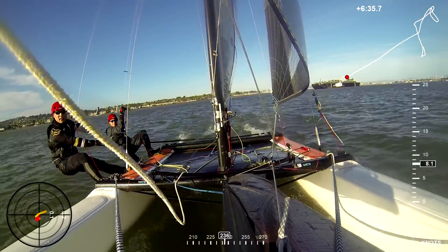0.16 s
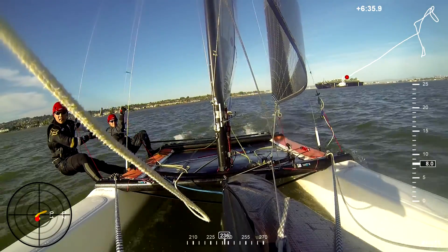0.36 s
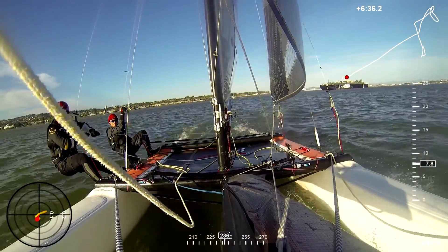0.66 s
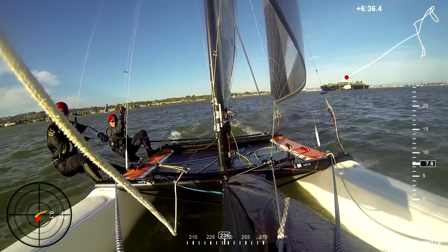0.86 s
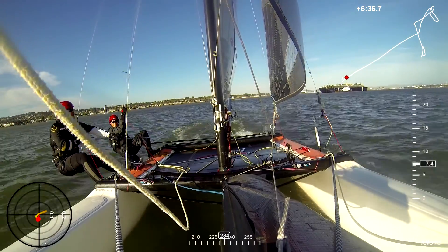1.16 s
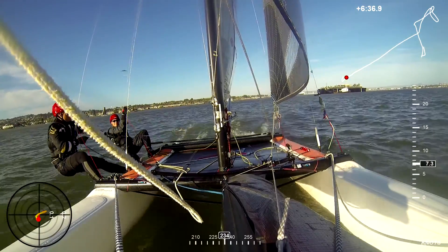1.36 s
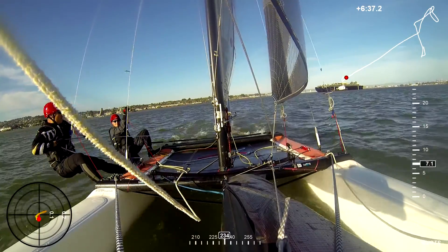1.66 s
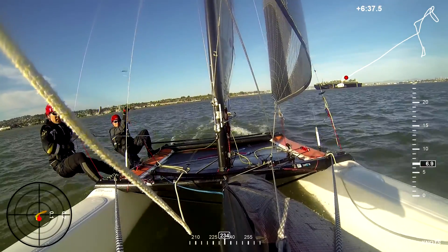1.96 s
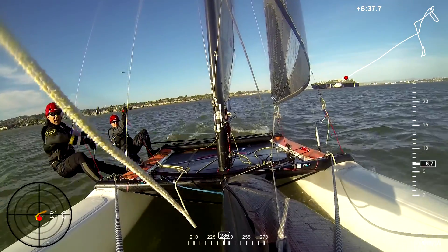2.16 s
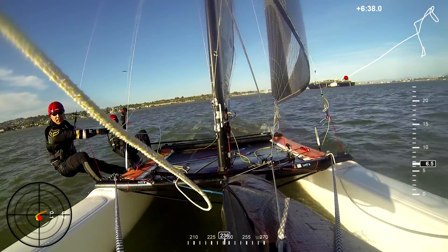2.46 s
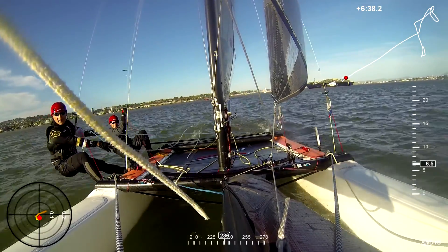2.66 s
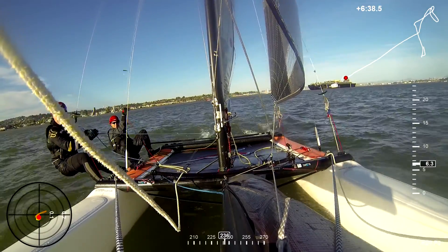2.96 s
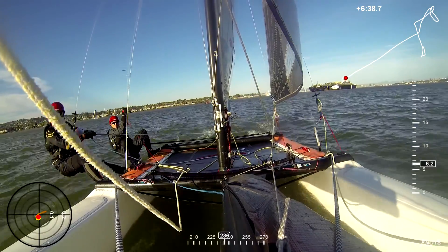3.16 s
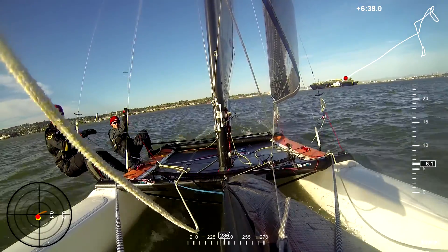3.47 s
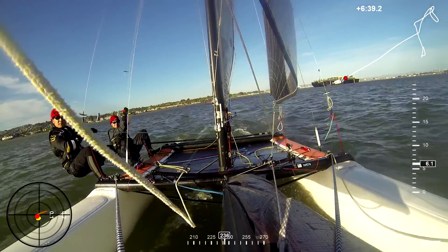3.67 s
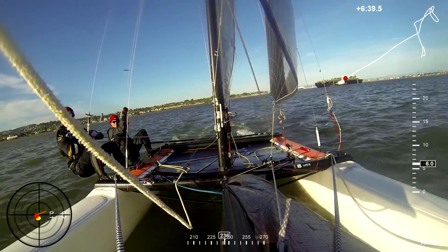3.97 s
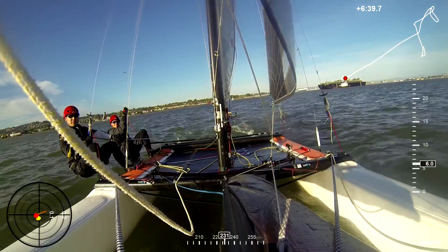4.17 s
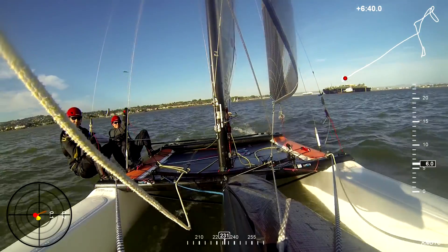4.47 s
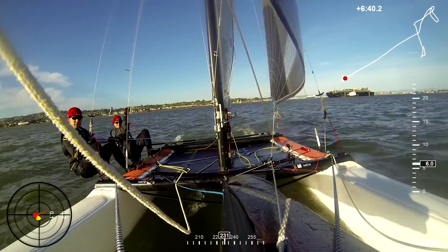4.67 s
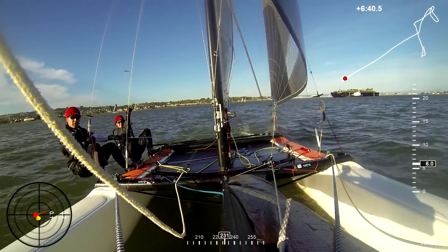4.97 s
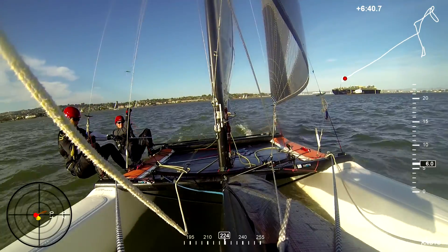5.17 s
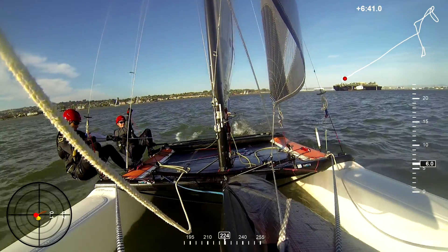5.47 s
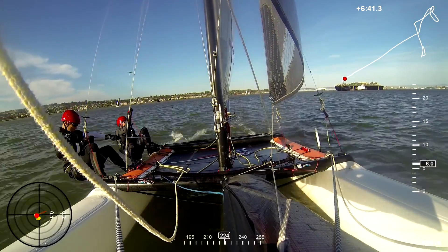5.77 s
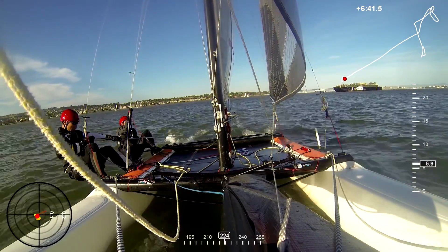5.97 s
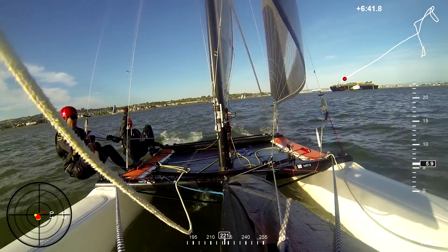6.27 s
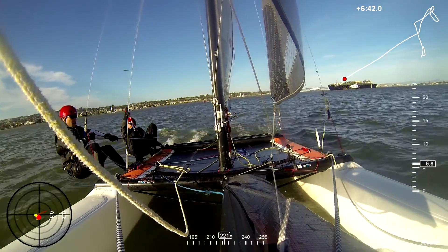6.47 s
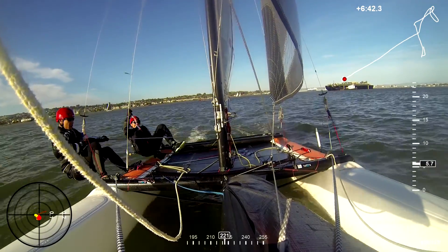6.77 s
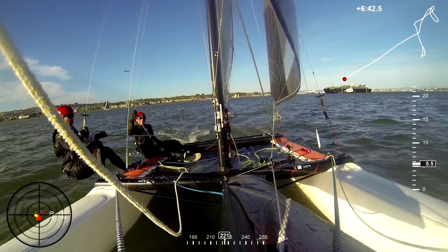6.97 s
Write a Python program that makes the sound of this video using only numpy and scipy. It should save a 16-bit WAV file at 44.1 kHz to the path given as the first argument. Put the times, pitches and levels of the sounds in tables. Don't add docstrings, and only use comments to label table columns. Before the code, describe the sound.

A small closed case on the bow of a fast two-hulled sailboat picks up low, lumpy wind buffeting and muffled water rushing along the hulls, over faint electronic hiss and buzz. Droplets tick on the case from the start, with a faint low whistle of wind on a stay in the first half second. A strong gust booms around 1.4 to 1.8 s, and the water dips slightly behind it. The wash surges near 2.3 s, with plops and knocks, the whistle returns around 2.7 to 3 s, and a hard tick lands at 2.8 s. A ringing boom comes at 3.8 s. The water eases towards 5.4 s, then rises again by 6 s with low wind shoves, snaps and a splashy knock near 6.15 s. Tiny high rope squeaks appear from 5.7 to 6.8 s. At about 6.88 s a heavy sheet of water slaps the case with a thud, and the background ducks briefly before the end.

```python
import sys
import numpy as np
from scipy import signal
from scipy.fft import rfft, irfft, next_fast_len
from scipy.io import wavfile
from scipy.ndimage import uniform_filter1d

SR = 44100
rng = np.random.default_rng(int(sys.argv[2]) if len(sys.argv) > 2 else 0)


def amplitude_ratio(level_db):
    exponent = np.asarray(level_db, float) / 20
    return 10 ** exponent


def master_out(mix):
    frames = np.transpose(np.atleast_2d(mix))
    ceiling = np.clip(frames, -1, 1)
    pcm = np.round(ceiling * 32767).astype(np.int16)
    wavfile.write(sys.argv[1], SR, pcm)


N = 313330
TIME = np.arange(N) / SR


def rms_one(x):
    return x / np.sqrt(np.mean(x ** 2) + 1e-20)


def in_time(rows):
    s, *columns = np.transpose(rows)
    return [np.interp(TIME, s, column) for column in columns]


def swing(rows, share):
    level_db = in_time(rows)[0]
    return level_db.mean() + share * (level_db - level_db.mean())


def passing(rows, layer_hz, octaves):
    out = np.zeros(N)
    for s, half, top_db, hz in rows:
        near = slice(max(0, int((s - 3 * half) * SR)), int((s + 3 * half) * SR))
        pitch_match = (np.log2(hz / layer_hz) / octaves) ** 2
        out[near] += top_db * np.exp(-pitch_match - ((TIME[near] - s) / half) ** 2)
    return out


def drift(rate):
    r = np.exp(-40 * np.pi * rate / SR)
    noise = rng.standard_normal(N // 20 + 4002)
    slow = signal.lfilter([1], [1, -2 * r, r * r], noise)[4000:]
    return np.interp(np.arange(N) / 20, np.arange(len(slow)), rms_one(slow))


def evened(x, window_s):
    return x / np.sqrt(uniform_filter1d(x ** 2, size=int(window_s * SR)) + 1e-20)


def band(x, low_hz, high_hz):
    run_in = np.concatenate([x[SR // 4:0:-1], x])
    sos = signal.butter(3, [low_hz, high_hz], "band", fs=SR, output="sos")
    return signal.sosfilt(sos, run_in)[-N:]


def colour(x, spectrum, modes=()):
    size = next_fast_len(N + SR)
    hz = np.maximum(np.fft.rfftfreq(size, 1 / SR), 1)
    corner_hz, corner_db = np.transpose(spectrum)
    db = np.interp(np.log(hz), np.log(corner_hz), corner_db)
    db = db + sum(top_db / (1 + (2 * (hz - f) / width) ** 2) for f, width, top_db in modes)
    cepstrum = irfft(np.log(amplitude_ratio(db)), size)
    cepstrum[1:size // 2] *= 2
    cepstrum[size // 2 + 1:] = 0
    return irfft(rfft(np.resize(x, size)) * np.exp(rfft(cepstrum)), size)[:N]


def resonance(x, hz, width):
    r = np.exp(-np.pi * width / SR)
    top = np.array([1, 0, -1]) * (1 - r * r) / 2
    return signal.lfilter(top, [1, -2 * r * np.cos(2 * np.pi * hz / SR), r * r], x)


# (time [s], level [dB])
WIND_STRENGTH = [(0, -24.5), (.5, -20.5), (.85, -21.5), (.97, -29), (1.35, -23.5), (1.44, -12.5),
                 (1.85, -16.5), (2.05, -22.5), (2.85, -20.5), (3.4, -27.5), (3.7, -29.5), (3.85, -20),
                 (4.4, -30), (4.65, -23), (5.8, -28), (6.75, -26), (6.95, -40.5), (7.1, -29)]
# (time [s], half length [s], level over the wind [dB], size as pitch [Hz])
EDDIES = [(.32, 0.2, 8.5, 25), (.51, 0.061, 3, 69.6), (.61, 0.048, 9, 25), (.93, 0.062, 9.5, 25),
          (1.53, 0.054, -24, 25), (1.66, 0.073, 5.5, 55.4), (1.74, 0.035, -12, 65.6),
          (2.39, 0.061, 5.5, 171), (2.57, .04, 4, 24.8), (2.57, 0.039, -11, 109), (2.83, 0.043, -0.5, 70),
          (3.5, 0.022, 14.5, 25), (3.64, 0.033, 10, 25), (3.81, 0.041, 3, 170), (4.41, 0.077, 12, 25),
          (4.76, 0.15, -18, 40.4), (5.18, 0.088, -12, 55), (5.48, 0.023, 11.5, 25), (5.57, 0.06, 2, 120),
          (5.91, 0.023, 9, 150), (6.02, 0.087, 12, 25), (6.25, 0.069, 16, 44.2), (6.36, 0.023, -12, 100),
          (6.62, 0.066, 12, 64.6), (6.78, 0.11, 11, 25), (7.02, 0.054, 13, 25)]
# (frequency [Hz], level per Hz [dB])
BUFFET_COLOUR = [(7.1, -25), (12, 6), (25, -2), (92, -6), (181, -2), (294, -12), (345, -23.5), (400, -16.5),
                 (520, -70.5), (880, -120)]
# (frequency [Hz], width [Hz], gain [dB])
CASE_MODES = [(129.3, 11.3, 6.5), (186, 64, 5.5), (353.4, 35, 6.5), (552.4, 294, 11.5), (683, 67, -5.5),
              (966, 190, 9), (1060, 660, -1.5), (1471, 330, 7.5), (1720, 190, 8.5), (2090, 126, -8),
              (2330, 50, 7), (2810, 210, -6), (5930, 820, -8.5), (6450, 420, 4.5)]


def wind(lumpy_db):
    octaves = 0.84
    heave_db = -2 + swing(WIND_STRENGTH, 0.2) + passing(EDDIES, 33, octaves)
    buffet_db = -4 + swing(WIND_STRENGTH, 0.87) + passing(EDDIES, 69, octaves)
    boom_db = -2.5 + swing(WIND_STRENGTH, 0.96) + passing(EDDIES, 140, octaves)
    noise = colour(rng.standard_normal(N), BUFFET_COLOUR, CASE_MODES)
    heave = evened(band(noise, 10.9, 51.5), 0.28)
    buffet = evened(band(noise, 44.3, 80.7), 0.1)
    boom = evened(band(noise, 95.4, 274.0) * amplitude_ratio(lumpy_db * drift(25)), 0.058)
    return amplitude_ratio(heave_db) * heave + amplitude_ratio(buffet_db) * buffet + amplitude_ratio(boom_db) * boom


# (time [s], level [dB])
WHISTLE_LEVEL = [(0, -33), (.3, -30.5), (.6, -57.5), (2.5, -45), (2.7, -33), (3.0, -33), (3.2, -59),
                 (7.1, -56.5)]


def whistle(wire_hz, width):
    noise = resonance(resonance(rng.standard_normal(N), wire_hz, width), wire_hz, width)
    return amplitude_ratio(in_time(WHISTLE_LEVEL)[0]) * rms_one(noise)


def droplets(per_s, spread_db, surge):
    sizes = amplitude_ratio(spread_db * np.minimum(rng.exponential(1, N), 2)) * rng.choice([-1, 1], N)
    clicks = sizes * (rng.random(N) < per_s * amplitude_ratio(5 * surge) / SR)
    dealt = rng.integers(0, 12, N)
    out = np.zeros(N)
    for k, hz in enumerate(np.geomspace(400, 6000, 12)):
        ring = resonance(clicks * (dealt == k) + 1e-18, hz, hz / 8)
        out += resonance(ring, hz, hz / 8)
    return rms_one(out)


# (time [s], level [dB])
WATER_SPEED = [(0, -30), (.15, -33.5), (.8, -35.5), (1.1, -32.5), (1.5, -35.5), (2.0, -31), (2.3, -24),
               (2.85, -33), (3.2, -35), (3.6, -36), (3.9, -35.5), (4.25, -36.5), (4.55, -37.5),
               (5.2, -39.5), (5.4, -43.5), (6.05, -33), (6.5, -34.5), (7.1, -33.5)]
# (time [s], half length [s], level over the flow [dB], colour [Hz])
WAVES = [(.37, 0.25, 4, 2200), (.49, 0.034, 5.5, 480), (.81, 0.12, 4.5, 598), (.95, 0.024, -9.5, 1290),
         (1.07, 0.1, 5, 900), (1.22, 0.14, 3.5, 4000), (1.38, 0.044, 4, 480), (1.62, 0.056, 10, 700),
         (2.45, 0.24, -7.5, 4040), (2.69, .07, 5.5, 1300), (3.34, 0.023, -1, 4000), (3.58, 0.26, 5.5, 1800),
         (4.25, 0.059, 2, 600), (4.73, 0.078, 7.5, 1290), (5.02, 0.16, 6, 2160), (5.2, 0.057, 9.5, 700),
         (5.61, 0.059, 9.5, 477), (5.77, 0.3, 4.5, 4000), (6.72, 0.052, 5, 1280), (.05, 0.049, -2, 700),
         (.75, 0.096, 6, 2500), (2.05, 0.071, -5, 700), (2.5, 0.081, -3.5, 696), (3.15, 0.04, 4.5, 870),
         (3.7, 0.037, -2.5, 700), (3.93, 0.05, 2.5, 900), (4.35, 0.1, 4.5, 2500), (4.68, 0.039, -8.5, 500),
         (5.4, 0.09, 4.5, 723), (6.42, 0.034, 3.5, 2507), (6.56, 0.02, -6.5, 1500), (3.5, .05, 2, 3000),
         (2.0, 0.036, 3.5, 1000)]
# (frequency [Hz], level per Hz [dB])
RUSH_COLOUR = [(150, -30), (250, 2.5), (450, -10.5), (1230, -18.5), (1700, -18), (2330, -26.5),
               (3800, -43.5), (4900, -55), (6000, -54.5), (9000, -63.5)]


def water(per_s, spread_db, drops_db, surge_db, patchy_db):
    surge = .6 * drift(13) + .8 * drift(30)
    drops = droplets(per_s, spread_db, surge)
    flow = colour(rng.standard_normal(N) + amplitude_ratio(drops_db) * drops, RUSH_COLOUR, CASE_MODES)
    octaves = 1.85
    gurgle_db = -3 + swing(WATER_SPEED, 0.92) + passing(WAVES, 480, octaves)
    rush_db = -5 + swing(WATER_SPEED, 1) + passing(WAVES, 1500, octaves)
    spray_db = -11.5 + swing(WATER_SPEED, 1) + passing(WAVES, 3900, octaves)
    layers = ((gurgle_db, [280, 450, 800]),
              (rush_db, [800, 1200, 1550, 2045]),
              (spray_db, [2102, 2540, 3000, 3600, 4400, 6100, 9500]))
    size = next_fast_len(N + 2000)
    spectrum = rfft(np.pad(flow, 1000, "reflect"), size)
    hz = np.fft.rfftfreq(size, 1 / SR)
    out = np.zeros(N)
    for level_db, edges in layers:
        parts = np.zeros(N)
        for lo, hi in zip(edges, edges[1:]):
            window = 1 / (1 + (hz / hi) ** 10) - 1 / (1 + (hz / lo) ** 10)
            part = irfft(spectrum * window, size)[1000:1000 + N]
            parts += part * amplitude_ratio(patchy_db * np.clip(drift(16), -2, 2))
        out += amplitude_ratio(level_db) * evened(parts * amplitude_ratio(surge_db * surge), 0.18)
    return out


# (frequency [Hz], level per Hz [dB])
HISS_COLOUR = [(2000, -27.5), (4500, 4), (8000, -7), (9500, -5), (12500, -4), (13500, -13.5), (14200, 1.5),
               (15300, -2.5)]
# (frequency [Hz], width [Hz], level [dB])
BUZZ_TONES = [(5134, 280, 4), (10300, 400, -7.5), (11200, 2500, -3), (14300, 1400, -4.5)]


def circuits(hiss_db, burst_db):
    pictures_per_s = 29.97
    steady = rms_one(colour(rng.standard_normal(N), HISS_COLOUR))
    gate = uniform_filter1d(1. * ((TIME * pictures_per_s + .125) % 1 < .4), size=60)
    white = rng.standard_normal(N)
    buzz = np.zeros(N)
    for hz, width, db in BUZZ_TONES:
        tone = rms_one(resonance(resonance(white, hz, width), hz, width))
        buzz += amplitude_ratio(db + 2.2 * drift(8.4)) * tone
    return amplitude_ratio(hiss_db) * (steady + amplitude_ratio(burst_db) * gate * buzz)


# (time [s], peak [dB], ring [Hz], ring t60 [s])
SOFT_DROPS = [(.461, -10.5, 1510, 0.015), (1.027, -22, 1550, 0.022), (1.126, -15.5, 1092, 0.083),
              (1.675, -18, 1510, 0.016), (1.733, -16.5, 1540, 0.022), (1.331, -20.5, 2710, 0.018),
              (4.926, -41, 3400, .03), (1.257, -27, 1266, 0.087), (4.097, -31, 2400, 0.026),
              (3.786, -26, 2310, 0.027), (1.778, -15, 980, 0.022), (2.198, -16, 600, 0.017),
              (2.416, -22, 570, 0.027), (2.644, -8.5, 1720, 0.058), (2.748, -7, 1326, 0.015),
              (3.604, -14.5, 1580, 0.057), (3.863, -16, 1720, 0.073), (3.995, -21, 1060, 0.035),
              (4.35, -19, 565, 0.047), (4.785, -24, 1460, 0.12), (4.877, -23, 1595, 0.036),
              (5.19, -20.5, 1630, 0.082), (5.452, -17, 1480, 0.012), (5.554, -24, 1680, .016),
              (5.972, -10.5, 1325, 0.017), (6.163, -3.5, 967, 0.019), (6.665, -18, 1687, 0.069),
              (6.698, -14, 890, 0.026), (6.809, -9, 1300, 0.019), (.777, -22, 1650, 0.067)]
# (time [s], peak [dB], ring [Hz])
SPECKS = [(0.0044, -16.5, 1530), (0.063, -20, 1440), (0.1125, -19, 1400), (0.135, -20, 1510),
          (0.2333, -16.5, 1510), (0.28, -23, 1450), (0.4848, -24, 1550), (0.506, -33, 1670),
          (0.5332, -25, 1550), (0.6376, -21, 1390), (0.734, -21, 1710), (0.8849, -22, 1700),
          (0.9122, -17, 1700), (1.066, -19, 1730), (1.1179, -20, 1090), (1.506, -30, 1460),
          (1.5524, -18.5, 1710), (1.593, -13, 1510), (1.7654, -23, 958), (1.911, -18, 1410),
          (2.1078, -18, 1700), (2.7539, -14.5, 980), (2.765, -19, 1520), (3.0041, -26, 1760),
          (3.237, -17.5, 1510), (3.4555, -19, 1760), (3.5643, -17, 910), (3.9415, -20, 1580),
          (3.9778, -19, 1440), (4.008, -15, 1010), (4.1896, -30, 1770), (4.2977, -28, 1740),
          (4.6288, -23, 1620), (4.8114, -19, 1410), (5.0604, -21, 1560), (5.1114, -19, 1720),
          (5.281, -21, 1780), (5.5022, -30, 1720), (5.653, -28, 1160), (6.0077, -22, 1740),
          (6.75, -14, 1580), (7.0214, -23, 1660)]
# (time [s], peak [dB], ring [Hz], bright part [dB])
HARD_TICKS = [(0.303, -23, 1720, -10), (0.643, -26, 1400, -19), (1.246, -29, 1270, -3),
              (1.338, -26, 1614, -7), (1.578, -25, 1490, -11), (2.28, -17, 1400, -5.5),
              (2.819, -2, 1337, -5), (3.418, -25, 1500, -21), (3.784, -12.5, 1470, -27),
              (5.833, -27, 1430, -6), (5.948, -11, 1460, -12.5), (6.124, -27, 1820, -10),
              (6.404, -22, 994, -12), (6.841, -20, 1630, -7)]


def knocks(rise_cycles, crack_db):
    soft_bright_db = -31.5
    rows = [(s, db, hz, soft_bright_db, t60) for s, db, hz, t60 in SOFT_DROPS]
    rows += [(s, db - 5.5, hz, soft_bright_db, .02) for s, db, hz in SPECKS]
    for s, db, hz, bright_db in HARD_TICKS:
        t60 = 0.037 * amplitude_ratio(-0.5 * (db + 17.0))
        rows.append((s, db, hz, bright_db, t60))
    out, crack = np.zeros(N), np.zeros(N)
    t = np.arange(int(.2 * SR)) / SR
    for s, peak_db, hz, bright_db, t60 in rows:
        detune, partner = rng.random(2)
        at = round(s * SR)
        u = t[:N - at]
        shape = (1 - np.exp(-u * hz / rise_cycles)) ** 2 * amplitude_ratio(-60 * u / max(t60, .01))
        shape /= shape.max()
        pair_hz = hz * (1.1 + 0.12 * detune)
        tone = np.sin(2 * np.pi * hz * u) + 0.26 * np.sin(2 * np.pi * pair_hz * u)
        bright = amplitude_ratio(bright_db - 3.5) * shape * np.sin(2 * np.pi * (2600 + 200 * partner) * u)
        out[at:at + len(u)] += amplitude_ratio(peak_db) * shape * (tone + bright)
        crack_fall = amplitude_ratio(peak_db + bright_db + crack_db - 60 * u / 0.014)
        crack[at:at + len(u)] += crack_fall * (1 - np.exp(-u / 0.0027))
    tilt = [(1500, -27.0), (3200, 12.5), (4200, 1), (5500, -41.0), (8500, -24.0), (14000, -29.0)]
    return out + crack * rms_one(colour(rng.standard_normal(N), tilt))


# (time [s], length [s], level [dB], first colour [Hz], last colour [Hz])
WASHES = [(0.296, 0.057, -26.5, 2140, 1530), (0.635, 0.078, -30.5, 1550, 1690),
          (1.017, 0.069, -28, 1730, 1670), (2.275, 0.032, -24, 1840, 1600),
          (2.743, 0.034, -19.5, 1600, 1760), (2.747, 0.037, -23, 700, 400), (2.908, 0.17, -31, 1630, 1700),
          (3.854, 0.036, -25, 1890, 970), (3.987, 0.087, -26.5, 1630, 705), (4.008, 0.041, -54, 4860, 5100),
          (4.253, .067, -29.5, 1200, 610), (5.186, 0.03, -32, 900, 700), (2.195, .07, -31, 1700, 2200),
          (5.282, 0.14, -38.5, 1750, 1940), (5.55, .07, -30, 2000, 1000), (5.825, 0.051, -29, 1290, 960),
          (6.021, 0.03, -33.5, 1870, 1800), (6.149, 0.088, -22, 905, 630), (6.399, 0.094, -29, 1200, 760),
          (6.659, 0.026, -26.5, 1690, 1560), (6.696, 0.018, -19, 1960, 585),
          (6.865, 0.021, -23.5, 593, 402.3), (7.021, 0.05, -28, 1930, 1830),
          (7.021, 0.058, -60, 5500, 5500), (7.019, 0.064, -37, 704, 654), (6.948, 0.061, -64.5, 4500, 4500),
          (7.088, 0.014, -46, 2800, 2800), (2.195, 0.061, -24, 516, 480), (2.285, 0.027, -51, 2800, 2700),
          (2.765, 0.0097, -47, 3200, 3270), (5.023, 0.017, -54, 3280, 3000),
          (6.869, 0.033, -28.5, 560, 560), (1.422, 0.16, -36, 400, 393)]
# (time [s], length [s], level [dB], first pitch [Hz], last pitch [Hz])
PLOPS = [(1.116, 0.024, -23, 1030, 990), (1.452, .035, -40, 2300, 2700), (1.78, 0.048, -27, 1040, 826),
         (2.205, 0.058, -20, 634, 510), (2.4, 0.02, -18, 850, 790), (2.652, 0.04, -28, 1730, 1700),
         (5.55, .045, -28, 1680, 1620), (5.557, .022, -29, 1180, 1150), (5.19, .022, -29, 1650, 1650),
         (5.185, .025, -29, 980, 950), (5.15, .035, -39, 2350, 2350), (5.705, .03, -40, 2300, 2250),
         (6.158, .02, -22, 1650, 1600), (2.3, 0.024, -25, 1300, 1600), (3.07, 0.044, -39, 2350, 2200),
         (3.312, 0.029, -35.5, 2660, 2350), (3.36, 0.015, -42, 3200, 2800), (2.9, 0.022, -35.5, 2400, 2400),
         (3.2, .02, -48, 4300, 4100), (4.912, 0.11, -44.5, 2150, 2200), (5.023, 0.033, -42, 2400, 2600),
         (6.844, 0.049, -30.5, 2830, 2500), (7.02, 0.077, -42, 2400, 2500), (2.581, 0.045, -38, 2600, 2100),
         (6.942, 0.078, -46, 2480, 2540)]


def splashes(grain_db, fade_db):
    grainy = rng.standard_normal(N) * amplitude_ratio(grain_db * drift(84))
    cased = colour(grainy, [(100, 0.013), (9000, 0.0079)], CASE_MODES)
    rows = [(*row, 0.7) for row in WASHES] + [(*row, 0.15) for row in PLOPS]
    out = np.zeros(N)
    for s, length, level_db, first_hz, last_hz, octaves in rows:
        at = round(s * SR)
        piece = cased[at:at + round(length * SR)]
        size = len(piece)
        u = np.linspace(0, 1, size)
        hz = np.fft.rfftfreq(size, 1 / SR) + 1

        def tuned(centre_hz):
            hump = np.exp(-(np.log2(hz / centre_hz) / octaves) ** 2)
            return rms_one(irfft(rfft(piece) * hump, size))

        slide = tuned(first_hz) * (1 - u) + tuned(last_hz) * u
        edges = np.minimum(1, np.minimum(u * length / .005, (1 - u) / .3))
        out[at:at + size] += amplitude_ratio(level_db + fade_db * u) * edges * slide
    return out


# (time [s], peak [dB], swing [Hz], length [swings])
GUST_PUSHES = [
    (0.902, -11.5, 26, 0.72),
    (2.319, -12, 10, 0.43),
    (3.769, -14.5, 176, 23),
    (3.871, -13.5, 51, 6.6),
    (5.901, -11.5, 168, 3.2),
    (6.223, -12, 27, 0.52),
    (6.68, -13.5, 18, 1.1),
    (6.84, -11.5, 15, 1.04),
    (6.88, -1, 150, 0.67),
    (6.885, -6, 61, 0.9),
]


def gust_pushes():
    out = np.zeros(N)
    for s, peak_db, hz, swings in GUST_PUSHES:
        turn = (TIME - s) * hz
        fall = (turn > 0) * np.exp(-np.clip(turn / swings, 0, 9) ** 3)
        out += amplitude_ratio(peak_db) * np.sin(2 * np.pi * turn) * fall
    return out


# (time [s], peak [dB])
SNAPS = [(1.199, -47), (1.429, -40), (1.515, -44.5), (1.73, -44), (2.0394, -41), (2.937, -40.5),
         (3.8688, -43), (5.9486, -36), (6.1597, -40.5), (6.2295, -37.5), (6.2587, -47)]


def snaps():
    puffs = np.zeros(N)
    for s, peak_db in SNAPS:
        at = round(s * SR)
        puffs[at:at + 900] += amplitude_ratio(peak_db - 3 - 60 * TIME[:900] / 0.0092)
    tilt = [(2000, -16.0), (3600, 3.0), (7000, -9.5), (14000, -25.0)]
    return puffs * rms_one(colour(rng.standard_normal(N), tilt))


# (time [s], depth [dB], hold [s])
DUCKS = [
    (1.49, -3, 0.25),
    (6.885, -10.5, 0.17),
]


def ducking():
    attack_s, release_s = .015, 0.052
    gain_db = np.zeros(N)
    for s, depth_db, hold in DUCKS:
        since = TIME - s
        ramp = np.minimum(since / attack_s, 1 - (since - hold) / release_s)
        gain_db += depth_db * np.clip(ramp, 0, 1)
    return gain_db


# (time [s], length [s], start pitch [Hz], end pitch [Hz], level [dB])
SQUEAKS = [
    (2.025, 0.014, 10210, 9900, -62),
    (2.026, 0.0087, 7260, 7000, -61),
    (5.722, 0.019, 9600, 11200, -57),
    (5.747, .006, 8600, 7600, -60),
    (6.448, 0.029, 6950, 9500, -59),
    (6.588, .015, 8600, 11600, -65),
    (6.624, 0.014, 6800, 9500, -60),
    (6.743, 0.059, 6700, 11200, -55),
]


def squeaks():
    out, rough = np.zeros(N), drift(500)
    for s, length, start_hz, end_hz, level_db in SQUEAKS:
        at, u = round(s * SR), np.linspace(0, 1, round(length * SR))
        phase = 2 * np.pi * length * (start_hz * u + (end_hz - start_hz) * u ** 2 / 2)
        arch = np.abs(np.sin(np.pi * u)) ** .5
        out[at:at + len(u)] += amplitude_ratio(level_db) * arch * rough[at:at + len(u)] * np.sin(phase)
    return out


# (start [s], peak [s], end [s], peak level [dB])
SHEETS = [
    (6.824, 6.877, 6.905, -20.5),
]


def slap(brightening, top_db):
    edge_db, cut_db_per_s = -30, 3998
    level_db = np.full(N, -110.)
    for start, peak, end, peak_db in SHEETS:
        outside = np.maximum(0, np.maximum(start - TIME, TIME - end))
        arch = edge_db * np.interp(TIME, [start, peak, end], [1, 0, 1]) ** 2.7
        level_db = np.maximum(level_db, peak_db + arch - cut_db_per_s * outside)
    grainy = rng.standard_normal(N) * amplitude_ratio(2.7 * drift(170))
    body_tilt = [(100, -11.5), (600, -9.5), (2600, -3.0), (4000, -29.5), (8000, -56.0), (15000, -76.5)]
    top_tilt = [(2000, -11.0), (4500, 0.0), (7000, -11.5), (9500, -25), (12000, -21.0), (14500, -28)]
    body = rms_one(colour(grainy, body_tilt, CASE_MODES))
    top = rms_one(colour(grainy, top_tilt))
    return amplitude_ratio(level_db) * body + amplitude_ratio(brightening * level_db + top_db) * top


def scene():
    air = wind(lumpy_db=3.5) + whistle(wire_hz=340.6, width=24) + gust_pushes()
    flow = water(per_s=900, spread_db=2.0, drops_db=-9.5, surge_db=2.0, patchy_db=2.13)
    steady = amplitude_ratio(ducking()) * (flow + circuits(hiss_db=-68.5, burst_db=-3.5))
    hits = knocks(rise_cycles=0.95, crack_db=0.5) + splashes(grain_db=2.0, fade_db=-1.5)
    hits += snaps() + squeaks() + slap(brightening=1.18, top_db=-16.0)
    return (air + steady + hits)[None]


def band_limit(x):
    return signal.sosfilt(signal.butter(12, 15290, fs=SR, output="sos"), x)


def record(dry):
    rounded = 1.3 * np.tanh(dry / 1.3)
    top_cut = signal.cheby2(10, 50, 15800, fs=SR, output="sos")
    mix = signal.sosfilt(top_cut, rounded)
    return band_limit(mix)


dry = scene()
out = record(dry)
master_out(out)
```